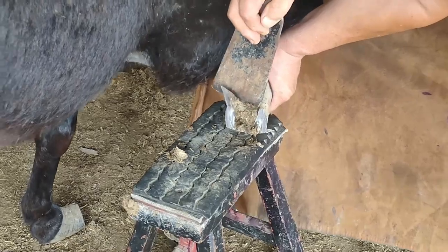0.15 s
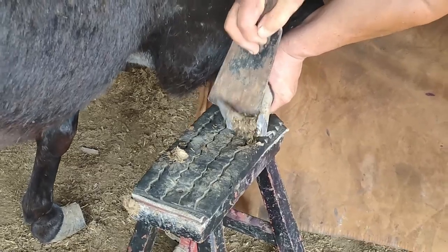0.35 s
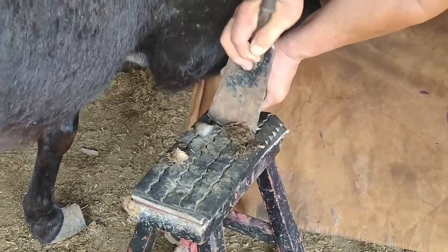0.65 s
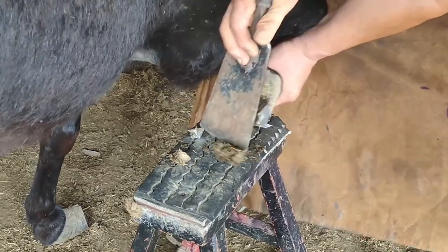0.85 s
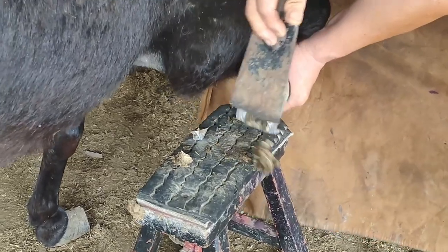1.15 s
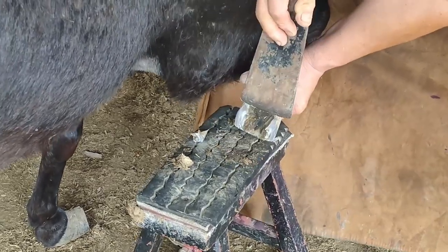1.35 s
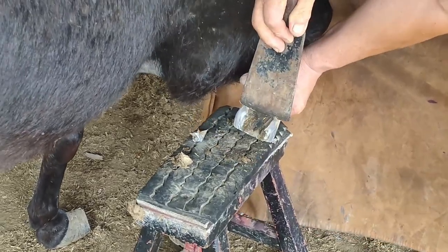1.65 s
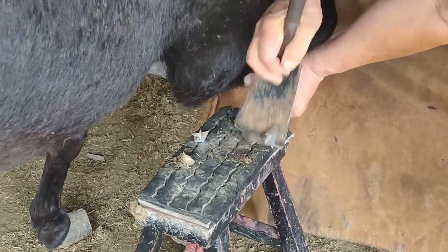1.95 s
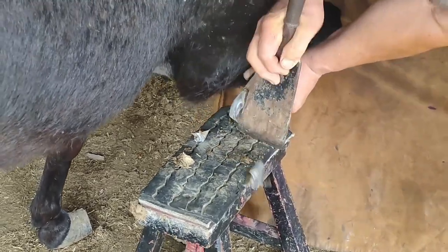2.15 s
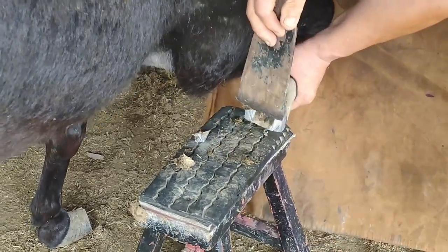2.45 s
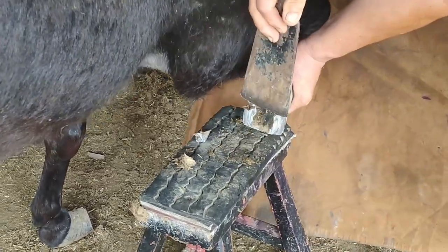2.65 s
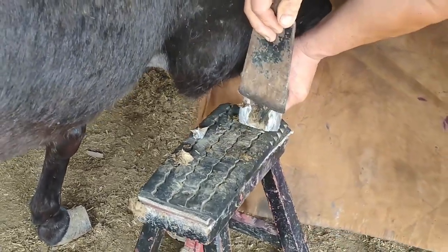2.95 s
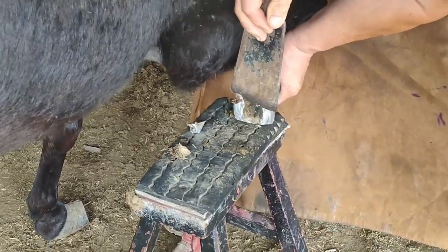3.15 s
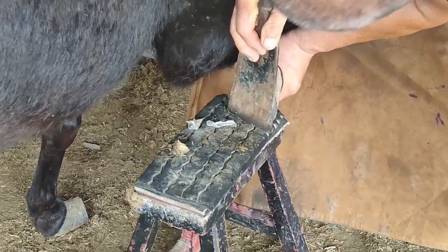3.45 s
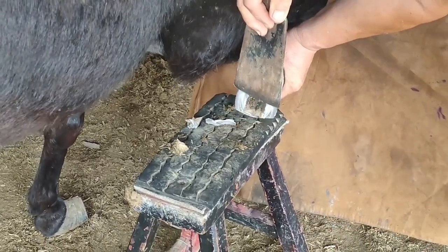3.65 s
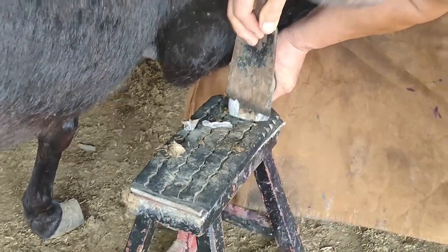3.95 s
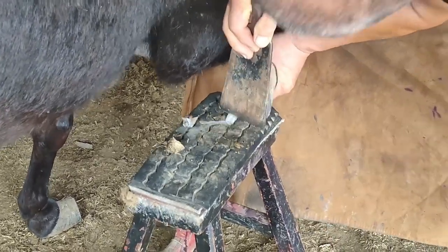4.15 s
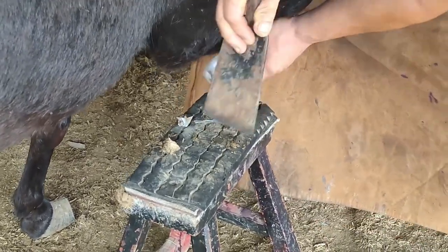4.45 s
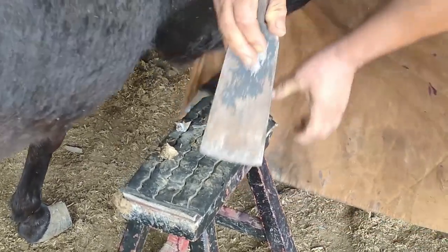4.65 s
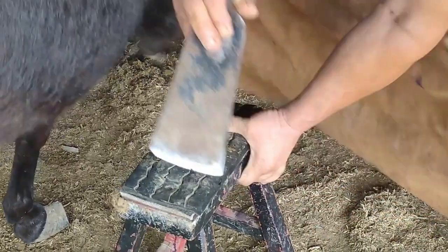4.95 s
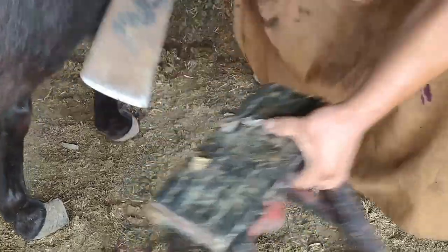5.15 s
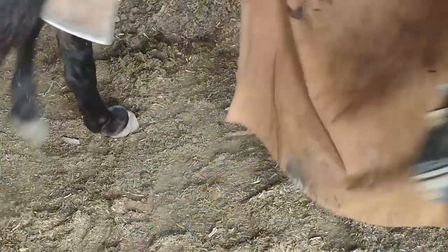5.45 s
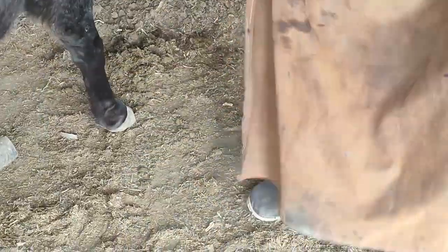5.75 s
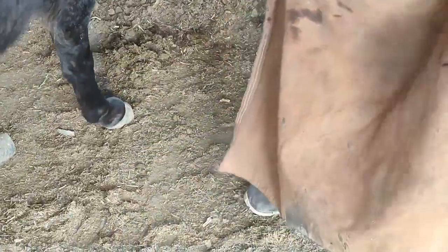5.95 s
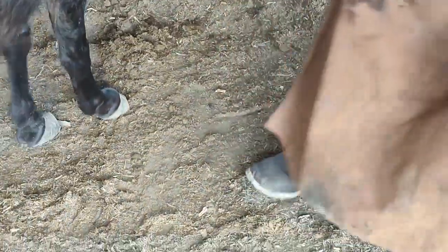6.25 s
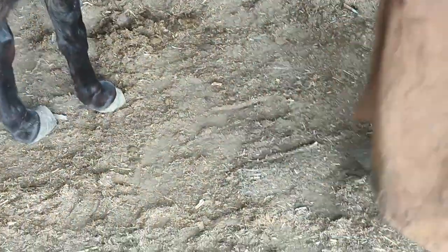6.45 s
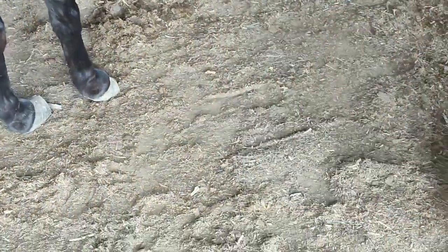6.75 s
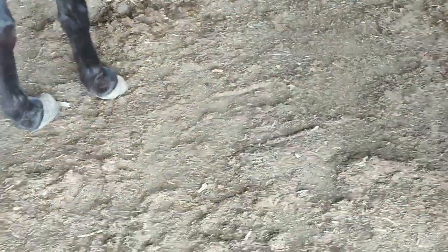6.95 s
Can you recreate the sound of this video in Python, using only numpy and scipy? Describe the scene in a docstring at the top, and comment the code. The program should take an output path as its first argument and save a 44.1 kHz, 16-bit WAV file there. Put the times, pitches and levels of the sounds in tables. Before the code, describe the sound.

Already sounding at 0 s, a low hoarse bray around 175 Hz growls and dies by 0.6 s, with a woody knock and gritty scrape on a hoof and a tiny peep at 0.76. Quiet yard murmur and soft wind gusts follow. From 1.8 to 2.7 s come wheezing, fluttering breaths with a nasal whistle, light scrapes, and a faint steely ring at 2.25. At 2.7 a cracked mid-pitched note sounds, dropping at 3.2 into a rough honk and a low bray until 4.2. A sharp scrape and knock hit at 4.1. From 4.2 a thin high cry climbs, holding strong from 4.8 to 5.5, slightly left. Rasping air and overlapping hoarse notes tumble from 5.4 to 6, with a brief high squeal at left's opposite side. A long gravelly bray from 6 s swells to the loudest blast near 6.8, then fades into breath by 7.1. A low hum, faint peeps and short shed echoes accompany it.

```python
"""Donkeys braying by a shed

Donkeys give long hoarse notes: partials of a gliding pitch, with growls made of uneven noisy beats.
A wheezing breath is noise through the throat's resonances, with a fluttering whistle in it.
Close by, a farrier's blade scrapes a hoof as gritty noise, knocks and rings once as decaying tones.
Wind is low noise with bumps and a hum, birds peep in sliding tones, and the yard murmurs as soft noise.
The brays, breath and peeps also get the echoes of the shed."""
import sys
import numpy as np
from scipy import signal
from scipy.fft import rfft, irfft, next_fast_len
from scipy.io import wavfile
from scipy.ndimage import uniform_filter1d, minimum_filter1d

SR = 44100
rng = np.random.default_rng(int(sys.argv[2]) if len(sys.argv) > 2 else 0)


def generate_wav(signal):
    """Clip the signal to [-1, 1] and save it as 16-bit WAV at the path in sys.argv[1]."""
    frames = np.transpose(np.atleast_2d(signal))
    scaled = np.clip(frames, -1, 1) * 32767
    pcm = np.round(scaled).astype(np.int16)
    wavfile.write(sys.argv[1], SR, pcm)


def ratio_of_db(decibels):
    """Turn decibels (scalar or array-like) into linear amplitude factors; 0 dB maps to 1."""
    return 10 ** (np.asarray(decibels, float) / 20)


N = 313572
T = np.arange(N) / SR


def level(x, db=0):
    """Scale to an rms level."""
    return x * ratio_of_db(db) / np.sqrt(np.mean(x ** 2))


def colour(x, points):
    """Filter by points of (f/Hz, level/dB), then scale to rms 1."""
    hz, db = np.transpose(points)
    size = next_fast_len(x.shape[-1])
    f = np.fft.rfftfreq(size, 1 / SR) + 1
    gain = ratio_of_db(np.interp(np.log(f), np.log(hz), db))
    return level(irfft(rfft(x, size) * gain, size)[..., :x.shape[-1]])


def ring(x, hz, width):
    """One resonance, gain 1 at its centre."""
    return signal.lfilter(*signal.iirpeak(hz, hz / width, SR), x)


def walk(rate, size=N):
    """Slow random wandering: levels held for 1 / rate seconds and smoothed twice; spread near 1."""
    hold = int(SR / rate)
    steps = np.repeat(rng.standard_normal(size // hold + 1), hold)
    return 1.3 * uniform_filter1d(uniform_filter1d(steps, hold), hold)[:size]


def humps(rows):
    """Sum of rounded swells in dB, from rows of (middle t/s, length/s, level/dB)."""
    return sum(db * np.cos(np.pi * np.clip((T - s) / length, -.5, .5)) ** 2 for s, length, db in rows)


def burst(s, length):
    """A quick rise to 1 at time s and a rounded fall."""
    u = np.clip((T - s) / max(length, .003) + .25, 0, 40)
    return 4 * u * np.exp(1 - 4 * u)


def strike(s, modes):
    """Tones that ring out from one moment, each fading at its own pace."""
    t = np.clip(T - s, 0, None)
    return sum(ratio_of_db(db - 60 * t / t60) * np.sin(2 * np.pi * hz * t) for hz, db, t60 in modes)


def read(rows, fade_s=.025):
    """Samples that a table spans, its columns there, and fades at its ends (none in at the very start)."""
    s, *columns = np.transpose(rows)
    span = slice(int(s[0] * SR), min(int(s[-1] * SR), N))
    t = T[span]
    fade = np.clip(np.minimum(t - s[0] + (s[0] < fade_s), s[-1] - t) / fade_s, 0, 1)
    return span, [np.interp(t, s, column) for column in columns], fade


def place(x, pan_db, lead_ms):
    """Two microphone ports a hand apart: one hears the sound louder, one hears it sooner."""
    n = np.arange(len(x))
    shift = lead_ms * SR / 2000
    return np.array([ratio_of_db(e * pan_db / 2) * np.interp(n + e * shift, n, x) for e in (1, -1)])


# colour of the yard's murmur: f/Hz, relative level/dB
YARD_COLOUR = [(80, -44.5), (130, -8), (500, -7), (2300, -8.5), (3200, -19.5), (5200, -9), (6500, -15.5),
               (8000, -12.5), (9500, -32), (14000, -43)]


def yard():
    """Distant murmur: soft wavering noise, half of it shared by the two ports."""
    far = rng.standard_normal(N) + rng.standard_normal((2, N))
    return colour(far, YARD_COLOUR) * ratio_of_db(-59 + 0.26 * walk(3.9))


# gusts of wind: middle t/s, length/s, level/dB above the calm
GUSTS = [(0, 0.95, 12), (1.95, 0.87, 4.3), (2.62, 0.82, 10)]
# pressure bumps: t/s, level/dB before the bass is trimmed and the ports differ
BUMPS = [(0.698, -32), (1.84, -31), (2.495, -21), (2.571, -24)]
# loudness of the hum before it wavers: t/s, level/dB
HUM_LEVEL = [(3.2, -78.5), (3.7, -56.5), (5.9, -49)]


def wind():
    """Low buffeting noise, partly shared by the ports, with single pressure bumps and a wavering hum."""
    calm_db, hum_hz = -53.5, 47
    gust = 1.8 * rng.standard_normal(N) + rng.standard_normal((2, N))
    gust = colour(gust, [(10, -18.5), (22, -2), (60, -4), (130, -21), (400, -29), (800, -69.5)])
    gust = gust * ratio_of_db(walk(32))
    # strong gusts rumble higher
    gust = level(gust) + level(ring(gust, 190, 130)) * ratio_of_db(humps(GUSTS) - 13)
    bumps = sum(-ratio_of_db(db) * burst(s, 0.015) for s, db in BUMPS)
    bass_trim = signal.butter(1, 25, "high", fs=SR, output="sos")
    bumps = signal.sosfilt(bass_trim, bumps) * np.array([[.7], [1.3]])  # stronger on the right
    hum_gain = ratio_of_db(np.interp(T, *np.transpose(HUM_LEVEL)) + 2 * walk(4.6))
    hum = hum_gain * np.sin(2 * np.pi * hum_hz * np.cumsum(1 + .04 * walk(14)) / SR)
    return gust * ratio_of_db(calm_db + humps(GUSTS)) + bumps + hum


# bird calls: t/s, starting f/Hz, level/dB, length/s, overtones' level/dB against the call
PEEPS = [(0.762, 1175, -40.5, 0.057, -4.5), (5.584, 3800, -45, 0.16, -57), (7.054, 3740, -45, 0.18, -46.5)]


def peeps():
    """Short bird whistles: trembling tones that slide upward, with two overtones."""
    out = 0
    for s, hz, db, length, over_db in PEEPS:
        phase = 2 * np.pi * np.cumsum(hz * (1 + .25 * (T - s)) + 14 * walk(200)) / SR
        shape = np.sin(np.pi * np.clip((T - s) / length, 0, 1) ** .6) * ratio_of_db(4 * walk(120))
        tone = np.sin(phase) + ratio_of_db(over_db) * np.sin(2 * phase)
        tone = tone + shape ** 3 * ratio_of_db(over_db - 12) * np.sin(3 * phase)
        out = out + ratio_of_db(db) * shape * tone
    return out


# scrapes of the blade and hooves: t/s, level/dB, steely top's level/dB, length/s
SCRAPES = [(0.581, -43.5, -6.5, 0.059), (0.621, -48, -3, 0.039), (1.731, -58.5, -28, 0.27),
           (1.907, -49.5, -1, 0.19), (1.999, -45.5, -2, 0.025), (2.44, -51, -1.5, 0.055),
           (4.106, -33, -3, 0.025)]
# the blade's ring: f/Hz, level/dB, time to fade by 60 dB/s
BLADE_RING = [(5400, -54, 0.3), (7537, -48, 0.13)]
# knocks on the hoof: t/s, level/dB
KNOCKS = [(.591, -28), (4.107, -34)]
# tones of a knocked hoof: f/Hz, level/dB against the knock, time to fade by 60 dB/s
HOOF_TONES = [(1260, -0.12, 0.053), (2050, -2, 0.05)]


def farrier():
    """Gritty scrapes with a woody middle and a steely top; the blade knocks the hoof and rings once."""
    grit = rng.standard_normal((2, N)) * ratio_of_db(3 * rng.exponential(size=N)) + .7 * rng.standard_normal(N)
    wood = level(ring(ring(grit, 1980, 1000), 1980, 1000))
    steel = level(ring(ring(grit, 4800, 2500), 5100, 5900))
    scrapes = sum(ratio_of_db(db) * burst(s, length) * (1.4 * wood + ratio_of_db(top_db) * steel)
                  for s, db, top_db, length in SCRAPES)
    knocks = sum(ratio_of_db(db) * strike(s, HOOF_TONES) for s, db in KNOCKS)
    return scrapes + strike(2.255, BLADE_RING) + knocks


# air rushing before the last bray: t/s, centre f/Hz, level/dB
RASP = [(5.56, 2073, -39.5), (5.64, 2247, -33.5), (5.76, 2690, -37.5), (5.84, 2950, -44.5)]


def rasp():
    """A harsh band of air that climbs: slow noise riding on a rising centre."""
    out = np.zeros(N)
    span, (hz, db), fade = read(RASP)
    size = len(hz)
    phase = 2 * np.pi * np.cumsum(hz) / SR
    band = walk(1500, size) * np.sin(phase) + walk(1500, size) * np.cos(phase)
    out[span] = fade * ratio_of_db(db) * band
    return out


# resonances of the throat: f/Hz, width/Hz, level/dB for each Hz of width
THROAT = [(392.3, 56, -5.5), (851, 152, -4.5), (1120, 33, -2.5), (1650, 41, -13), (2137, 140, -21.5),
          (3100, 63, -30)]
# puffs of breath: t/s, level/dB, time held/s
PUFFS = [(1.815, -37, 0.16), (1.995, -41, 0.0387), (2.071, -41.5, 0.045), (2.152, -41.5, .04),
         (2.228, -45.5, 0.083), (2.332, -37, 0.021), (2.371, -33, .025), (2.419, -34.5, 0.3),
         (2.701, -30.5, 0.092), (7.04, -36.5, .1)]
# moments when the hiss gives way to the whistle: middle t/s, length/s, level/dB
CLEAR = [(2.025, 0.15, 10.5), (2.345, 0.039, 6.5)]


def wheeze():
    """Puffs of breath: flickering noise through the throat's resonances, and a whistle in the nostrils."""
    rise_s, fall_db_per_s = .008, 330
    whistle_hz, sag_hz, whistle_db = 860, 140, 2
    air = rng.standard_normal(N) * ratio_of_db(1.5 * walk(45))
    breath = 0
    for hz, width, db in THROAT:
        breath = breath + ratio_of_db(db) * level(ring(ring(air, hz, width), hz, 3 * width)) * np.sqrt(width)
    breath = level(breath)
    shapes = []
    for s, db, held in PUFFS:
        fall = ratio_of_db(-fall_db_per_s * np.clip(T - s - held, 0, None))
        shapes.append(np.clip((T - s) / rise_s, 0, 1) * fall)
    puffs = sum(ratio_of_db(db) * shape for shape, (s, db, held) in zip(shapes, PUFFS))
    # the whistle's pitch sags as a puff dies
    sag = uniform_filter1d(1 - np.max(shapes, axis=0), size=900)
    hz = whistle_hz * (1 + .01 * walk(30)) - sag_hz * sag
    clear_db = humps(CLEAR)
    # it flutters in beads
    whistle = ratio_of_db(whistle_db + clear_db + 3 * walk(50)) * np.sin(2 * np.pi * np.cumsum(hz) / SR)
    return puffs * (breath * ratio_of_db(-clear_db) + whistle)


# colour of the growl: f/Hz, relative level/dB
GROWL_COLOUR = [(120, -48), (230, -3.5), (360, -8), (790, -1.5), (880, 4), (990, -1), (1500, -5.5),
                (2050, -5.5), (2600, -49), (3250, -34), (7600, -31.5), (11000, -65)]
# colour the head gives to the hiss and the high partials: f/Hz, relative level/dB
HEAD_COLOUR = [(1500, -15), (2400, 8), (2800, -9.5), (3200, -2.5), (4100, -15.5), (4700, -11), (5300, -12),
               (6400, -31.5), (7550, -8.5), (8800, -19.5), (12000, -53)]
# the mouth lifts or mutes partials near one pitch: middle t/s, length/s, f/Hz, level/dB
ACCENTS = [(0.368, 0.22, 890, 6), (4.12, 0.14, 965, 12), (4.52, 0.39, 1000, 13), (5.15, 1.2, 4700, 19.5),
           (3.37, .25, 5500, 14), (6.7, 1, 3260, 12), (6.159, 0.7, 1616, 16), (5.6, 0.4, 1800, -14),
           (4.15, 0.21, 490, -12), (6.62, 3.2, 4620, 15.5)]


def growl(hz, beat, uneven):
    """Uneven beats slower than the pitch: a noisy slap for each, and the folds rattling on after it."""
    size = len(hz)
    beats = np.cumsum(hz / beat * np.exp(np.clip(uneven, .3, 1) * walk(200, size))) / SR
    slaps = level(np.diff(np.floor(beats), prepend=0) * ratio_of_db(3 * uneven * walk(120, size)))
    crackle = rng.standard_normal(400) * ratio_of_db(-T[:400] * 60 / .004)  # fades by 60 dB in 4 ms
    slaps = level(np.convolve(slaps, crackle)[:size])
    rattle = level(rng.standard_normal(size) * np.exp(-(beats % 1) / .6))
    return colour(.4 * slaps + rattle, GROWL_COLOUR)


def note(span, hz, surge_db, break_db, growl_db, high_db, partials, lead, beat, uneven):
    """Partials of one pitch, a growl of slower uneven beats under them, and air hissing with each cycle."""
    high_top_hz, accent_width_hz = 8500, 120
    sink = 0.18  # dB that the other partials lose for each dB of break
    size = len(hz)
    turns = np.cumsum(hz) / SR
    head_hz, head_db = np.transpose(HEAD_COLOUR)
    accents = [(mouth_hz, humps([(s, length, db)])[span]) for s, length, mouth_hz, db in ACCENTS]
    tone = 0
    for k in range(1, int(high_top_hz / hz.mean())):
        if k <= len(partials):
            gain_db = partials[k - 1]
        else:
            gain_db = high_db + np.interp(np.log(k * hz), np.log(head_hz), head_db)
        if k == lead:
            # a strong break makes the leading partial falter
            gain_db = gain_db + surge_db - np.clip(break_db - 14.5, 0, None) * (1 + walk(70, size)) ** 2
        else:
            # the moving jaw lets each partial waver, and those above the first drop out on their own
            dropout = (4 + .2 * break_db) * hz / 380 * (k > 1) * np.clip(walk(70, size), 0, 2) ** 2
            waver = 2.2 * walk(18, size) + (1.5 + .04 * k) * walk(220, size)
            gain_db = gain_db + waver - dropout - sink * break_db
        for mouth_hz, lift_db in accents:
            gain_db = gain_db + lift_db * np.exp(-((k * hz - mouth_hz) / accent_width_hz) ** 2)
        fuzz = .003 * k * walk(250, size)  # the higher, the fuzzier
        tone = tone + ratio_of_db(gain_db) * np.sqrt(2) * np.sin(2 * np.pi * (k * turns + rng.random() + fuzz))
    air = rng.standard_normal(size) * (0.14 + np.cos(2 * np.pi * turns))
    hiss = ratio_of_db(-18 + 0.86 * growl_db) * colour(air, HEAD_COLOUR)
    flutter = ratio_of_db(1.2 * walk(30, size))
    return flutter * tone + ratio_of_db(growl_db) * growl(hz, beat, uneven) + hiss


# one table a note: t/s, pitch f/Hz before jitter, effort level/dB
NOTES = [
    [(0, 178.8, -19.5), (.3, 176.3, -18.5), (.36, 172.5, -19.5), (.43, 174.6, -21.5), (.52, 173.7, -34),
     (.62, 162.7, -53)],
    [(2.72, 385.3, -35), (2.8, 351.2, -20), (2.98, 346.3, -19.5), (3.06, 353.2, -19.5), (3.17, 359.2, -13),
     (3.27, 386, -24.5)],
    [(3.17, 213.5, -50), (3.22, 232, -32.5), (3.27, 247.1, -22.5), (3.34, 245.9, -22), (3.4, 245, -25.5),
     (3.46, 236.8, -26.5), (3.54, 238.6, -39)],
    [(3.44, 185.1, -27.5), (3.52, 179, -16.5), (3.73, 177.7, -17.5), (3.79, 167.9, -18.5),
     (3.9, 166.6, -21), (4.05, 163.6, -24.5), (4.14, 160.2, -26), (4.27, 180, -48)],
    [(4.19, 431.9, -43), (4.36, 426.6, -39), (4.43, 469.7, -43), (4.49, 490.5, -32.5), (4.56, 490.4, -26.5),
     (4.64, 537.6, -21.5), (4.7, 518, -21), (4.77, 541.5, -18), (4.89, 558.7, -18), (4.97, 575, -15.5),
     (5.3, 574.4, -16), (5.43, 593, -18.5), (5.53, 570, -40)],
    [(5.4, 247, -36), (5.56, 235.2, -29), (5.85, 239.8, -33.5), (5.98, 227.3, -38)],
    [(5.68, 286.2, -31), (5.74, 305.4, -22), (5.81, 317.5, -16.5), (5.85, 330, -33)],
    [(5.69, 326, -26.5), (5.76, 359.2, -26.5), (5.81, 366, -28), (5.85, 365.6, -20.5), (5.93, 375.6, -21),
     (6.01, 407.3, -17), (6.06, 367.4, -24)],
    [(6.0, 603.6, -31.5), (6.24, 615, -30.5), (6.33, 593, -43.5)],
    [(5.99, 255.4, -41.5), (6.04, 249.1, -13), (6.12, 268.7, -16), (6.2, 262.6, -22.5), (6.3, 255.3, -20),
     (6.55, 258.5, -17.5), (6.82, 258.9, 0.5), (6.92, 271.2, -15), (6.99, 269.6, -23.5),
     (7.065, 280.8, -37)],
]
# partials of each note, from the first upward: level/dB against the effort
PARTIALS = [
    [-24.5, 0.5, -18.5, -11.5, -6, -15.5, -18, -16.5, -22, -18, -23.5],
    [1, -19, -12.5, -16.5, -17, -25],
    [-3.5, 1.5, -1, 3, 1, 1, 3, -0.5, -18],
    [-28.5, 0, -16, -14, -12.5, -11, -18, -18.5, -22, -19.5, -18],
    [3.5, -9.5, -7, -25],
    [-3.1, -15, 0],
    [-7.5, -13.5, -1, -4.5, -25.5],
    [0.5, -38, -5.5, -13, -8.5],
    [0],
    [-10, -1, -12, -2, -3, -7, 2.5, -5.5, -34.5],
]
# each note: number of the leading partial, cycles in a growl beat
LEAD = [(2, 2), (1, 2), (5, 2), (2, 2), (1, 2), (3, 2), (3, 3), (1, 4), (1, 2), (7, 3)]
# each note: unevenness of the beats (0-1), left minus right level/dB, left's lead/ms (below 0 it lags),
# growl's level/dB against the note outside the breaks, high partials' level/dB
MANNER = [(0.3, 1, -0.01, -16.5, -39.5), (1, 0.5, -.02, -23, -39), (0, -0.5, -.02, -8.5, -19.5),
          (0.05, 0.4, -0.079, -18.5, -34), (0.21, -4.5, 0.28, -22.5, -46), (0.5, -0.5, 0.083, -11, -60.5),
          (0.64, -1, -0.16, -11, -44.5), (0, 3.2, -.02, -11.5, -31), (0.027, -26, 0.13, -9, -67),
          (0.2, -0.6, -0.02, -17, -28.5)]
# the leading partial swells as it locks to the throat, sinks as it slips off:
# middle t/s, length/s, level/dB
SURGES = [(.04, 0.071, 10), (.21, 0.34, 6), (.4, 0.21, -7), (.52, 0.18, 9.5), (2.96, 0.15, -6),
          (3.12, 0.35, 6.5), (3.61, 0.78, 6), (3.8, 0.17, -9.5), (4.6, 0.091, -11.5), (4.685, 0.064, -21),
          (4.74, 0.074, -11), (5.93, 0.028, -18), (6.855, 0.076, -15)]
# the voice breaks into a growl (below 0 the growl eases): middle t/s, length/s, level/dB
BREAKS = [(.09, 0.49, 15), (.51, 0.18, -9.5), (2.72, 0.16, 20.5), (3.26, 0.13, 16), (3.47, 0.17, 12.5),
          (3.61, 0.21, 14), (3.71, 0.2, 8), (4.38, 0.63, 17.5), (5.65, 0.22, 14), (5.78, 0.2, 7.5),
          (6.03, 0.31, 11.5), (7.03, 0.21, 21.5)]


def brays():
    """The donkeys' notes, each with its own pitch path, growl and side; the pitch shakes more in breaks."""
    out = np.zeros((2, N))
    surge_db, break_db = humps(SURGES), humps(BREAKS)
    jitter = 1 + (.003 + .0004 * break_db) * walk(60)
    for rows, partials, (lead, beat), manner in zip(NOTES, PARTIALS, LEAD, MANNER):
        uneven, pan_db, lead_ms, growl_db, high_db = manner
        span, (hz, db), fade = read(rows)
        breaking = break_db[span]
        voice = note(span, hz * jitter[span], surge_db[span], breaking, growl_db + breaking,
                     high_db, partials, lead, beat, uneven)
        out[:, span] += place(fade * ratio_of_db(db) * voice, pan_db, lead_ms)
    return out


def shed(x):
    """Near echoes from both flanks reach the ports in opposition, weak in the bass; a dull tail follows."""
    near_db, near_t60_s = 16.5, 0.16
    tail_db, tail_t60_s = -7, .8
    t = T[:SR]
    near, *tail = rng.standard_normal((3, SR)) / np.sqrt(SR)
    no_bass = signal.butter(4, 850, "high", fs=SR, output="sos")
    near = signal.sosfilt(no_bass, near * ratio_of_db(near_db - 60 * t / near_t60_s))
    dull = signal.butter(1, 900, fs=SR, output="sos")
    tail = signal.sosfilt(dull, tail * ratio_of_db(tail_db - 60 * t / tail_t60_s))
    echoes = tail + near * np.array([[1], [-1]])
    return x + signal.fftconvolve(x.mean(axis=0, keepdims=True), echoes, axes=1)[:, :N]


def scene():
    """All sources, left and right; the farrier, wind and yard get no echo."""
    echoing = shed(brays() + wheeze() + rasp() + peeps())
    return echoing + farrier() + wind() + yard()


def roll_off(x):
    """The treble ends steeply here."""
    return signal.sosfilt(signal.butter(12, 15000, fs=SR, output="sos"), x)


def record(dry):
    """The phone hears less around 8 kHz at its left port and turns the gain down around the loudest peaks."""
    left = dry[0] - .75 * ring(dry[0], 8000, 3500)
    mix = np.array([left, dry[1]])
    gain = np.minimum(1, .82 / (abs(mix).max(axis=0) + 1e-9))
    mix = mix * uniform_filter1d(minimum_filter1d(gain, size=800), size=800)
    return roll_off(mix)


dry = scene()
out = record(dry)
generate_wav(out)
```